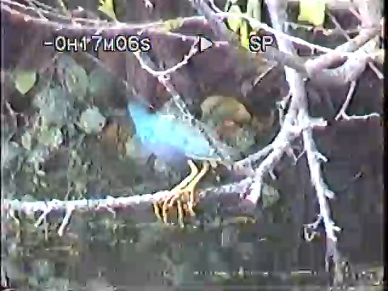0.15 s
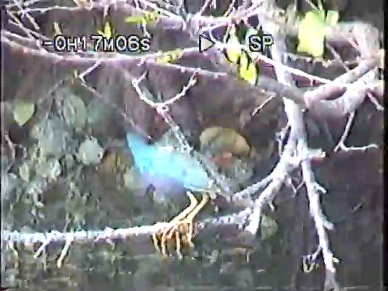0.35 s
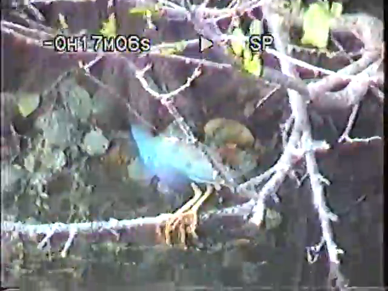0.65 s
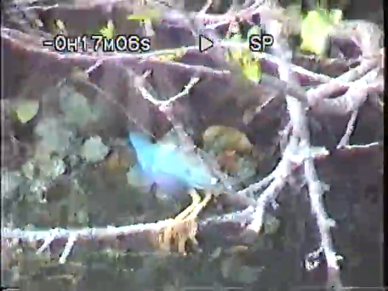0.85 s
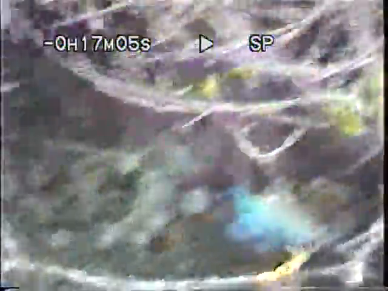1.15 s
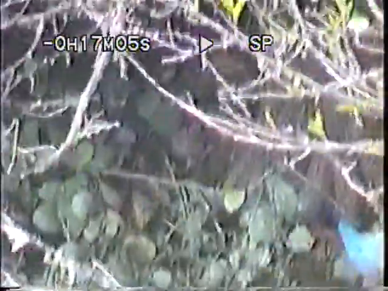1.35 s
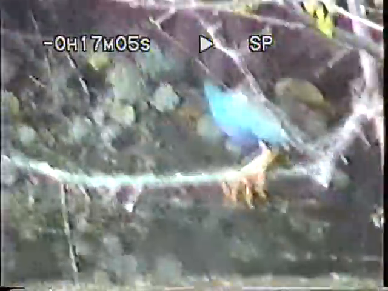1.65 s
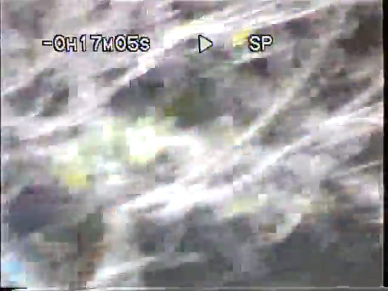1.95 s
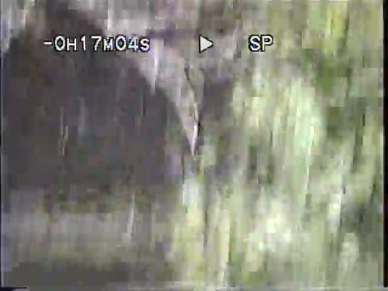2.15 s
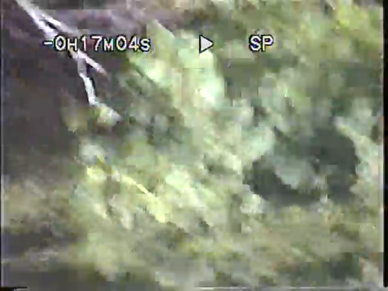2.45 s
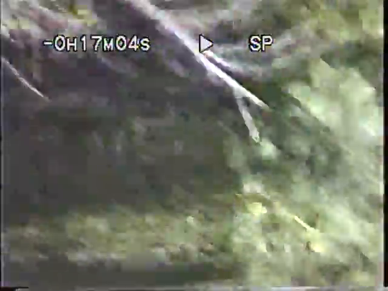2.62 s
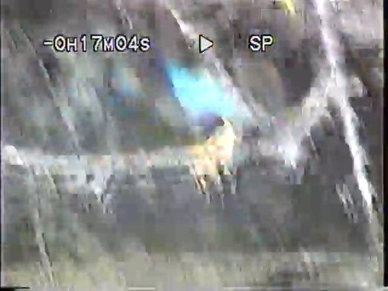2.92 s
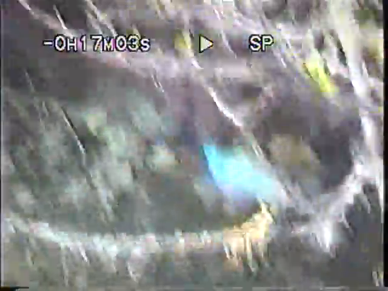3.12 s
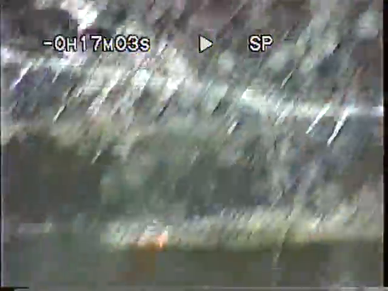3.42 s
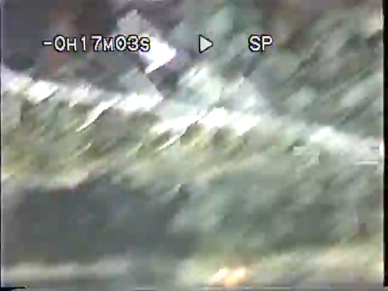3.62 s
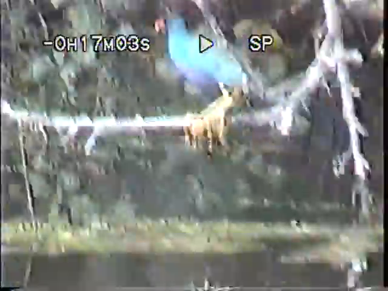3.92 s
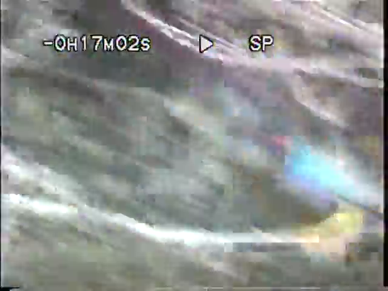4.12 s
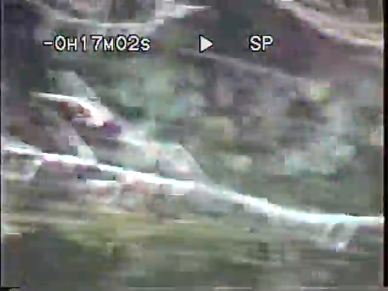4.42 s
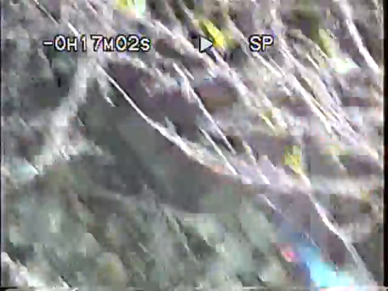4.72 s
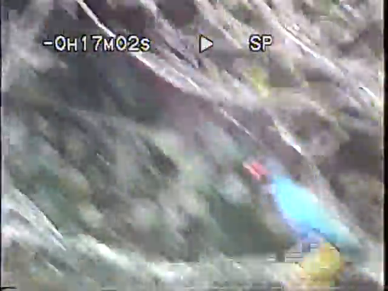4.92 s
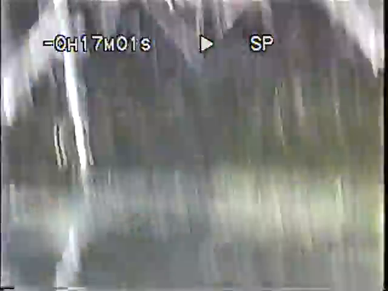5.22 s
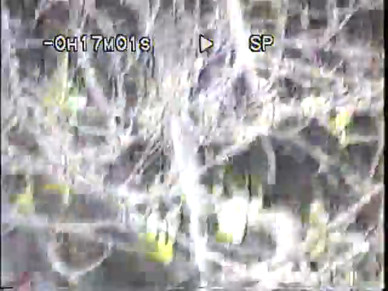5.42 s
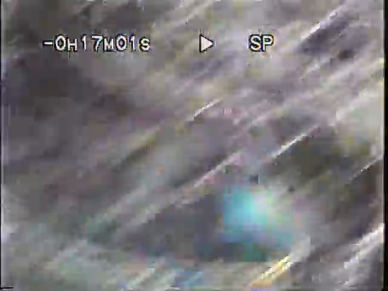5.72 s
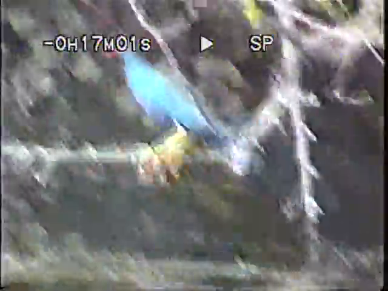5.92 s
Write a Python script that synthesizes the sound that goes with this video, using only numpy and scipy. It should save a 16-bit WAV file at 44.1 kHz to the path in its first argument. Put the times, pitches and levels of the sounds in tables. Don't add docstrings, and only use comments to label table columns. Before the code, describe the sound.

From 0 to about 2 seconds, a wetland bird gives harsh, buzzing two-voiced chatter: short notes, each under a tenth of a second, roughly every quarter second, strengthening toward the last at 1.85. Leaves and reeds rustle steadily and each note leaves a diffuse echo from the trees. Low gusts bump the microphone from 0.5 to 3 seconds, thickest around 2.5 to 2.8, where plastic handling creaks also tick. From 2.65 to 4.4, seven clear whistles start high, sag and hook downward, the last much weaker. Further birds add small chips around 2.4 to 2.6 and falling slides from 3.1, faint between 4.1 and 4.7, then bright and sharp at 4.95 and 5.45. Light creaks come at 4.3, 5.1 and 5.7, a last chip near 6. Wind is calmer late. A faint electrical buzz persists; the right side is nearly empty.

```python
import sys
import numpy as np
from scipy import signal
from scipy.fft import rfft, irfft, next_fast_len
from scipy.io import wavfile
from scipy.ndimage import uniform_filter1d, map_coordinates

SR = 44100
rng = np.random.default_rng(int(sys.argv[2]) if len(sys.argv) > 2 else 0)


def log_audio(samples):
    frames = np.atleast_2d(samples).T
    limited = np.clip(frames, -1, 1)
    pcm = np.round(limited * 32767).astype(np.int16)
    wavfile.write(sys.argv[1], SR, pcm)


def natural_amplitude(level_db):
    exponent = np.asarray(level_db, float) / 20
    return 10 ** exponent


N = 267466


def unit(x):
    return x / np.sqrt(np.mean(x ** 2) + 1e-20)


def curves(rows, t):
    s, *cols = np.transpose(rows)
    return [np.interp(t, s, c) for c in cols]


def wobble(rate, size):
    knots = rng.standard_normal(int(size * rate / SR) + 4)
    return map_coordinates(knots, [np.arange(size) * rate / SR])


def coloured(x, points):
    m = next_fast_len(len(x) + 4096)
    f, level = np.transpose(points)
    gain = natural_amplitude(np.interp(np.log(np.fft.rfftfreq(m, 1 / SR) + 1), np.log(f), level))
    return irfft(rfft(x, m) * gain, m)[:len(x)]


def add(out, s, x):
    i = round(s * SR)
    x = x[max(-i, 0):][:len(out) - max(i, 0)]
    out[max(i, 0):][:len(x)] += x


def phasor(hz):
    return np.exp(2j * np.pi * np.cumsum(hz) / SR)


def echoed(note, near_db, near_t60, trees_db, trees_s, trees_t60):
    # (frequency [Hz], gain [dB])
    leaf_colour = [(1900, -33), (2200, -5.5), (2600, -3.5), (3200, 4), (4000, -4.5), (5000, -3), (7500, 4),
                   (9500, -0.5), (13000, -1)]
    t = np.arange(int(.9 * SR)) / SR
    late = np.maximum(t - trees_s, 0)
    near = natural_amplitude(-60 * t / near_t60) * (t > .003)
    trees = natural_amplitude(-60 * late / trees_t60) * (1 - np.exp(-late / .015))
    far = natural_amplitude(-60 * late / 1.6) * (late > 0)
    shape = natural_amplitude(near_db) * near / np.linalg.norm(near)
    shape += natural_amplitude(trees_db) * trees / np.linalg.norm(trees)
    shape += natural_amplitude(trees_db - 3) * far / np.linalg.norm(far)
    wet = signal.fftconvolve(note, coloured(shape * rng.standard_normal(len(t)), leaf_colour))
    wet = wet * natural_amplitude(2.6 * np.tanh(wobble(260, size=len(wet))))
    add(wet, 0, note)
    return wet


def chatter():
    # (time after onset [s], upper pitch [Hz], upper level [dB], lower pitch [Hz], lower level [dB])
    note_shape = [(.006, 2950, -51, 2540, -46), (.014, 3750, -37, 2450, -39), (.025, 3700, -43, 2350, -42),
                  (.03, 3830, -32, 2640, -31), (.041, 4150, -33, 2300, -36), (.053, 3120, -35, 2170, -34),
                  (.063, 3230, -32, 2540, -38), (.07, 2750, -48, 2650, -22), (.083, 2750, -62, 2420, -25)]
    # (time [s], level as the head turns [dB], upper voice [dB], extra push on the last 20 ms [dB])
    chatter_notes = [(-.105, -2.5, -3.5, -1), (0.161, -7.5, -3.5, 3), (.426, -7, -2.5, 2.5),
                     (.709, -6.5, -2, 6), (.969, -5, -1, 1.5), (1.249, -4, -3, -2), (1.525, -1, -4, -1),
                     (1.849, 0, -4, -2.5)]
    fade_db_per_s = 1200
    echo_db, rasp_db = -13.5, -27.5
    trill_s, trill_crest_s, trill_db, warble_hz = .0098, .0695, 4, 130

    out, t = np.zeros(N), np.arange(int(.1 * SR)) / SR
    upper_hz, upper_db, lower_hz, lower_db = curves(note_shape, t)
    beak = np.exp(-((upper_hz + lower_hz - 6500) / 450) ** 2)
    beat = np.cos(2 * np.pi * (t - trill_crest_s) / trill_s)
    throb = trill_db * beat
    upper_hz = upper_hz + warble_hz * beat
    gate = signal.windows.tukey(len(t), .15)
    gate *= natural_amplitude(-fade_db_per_s * np.maximum(t - note_shape[-1][0], 0))
    for s, db, high_db, push_db in chatter_notes:
        shake = [np.tanh(wobble(rate, size=len(t))) for rate in (500, 500, 350, 300, 300, 300)]
        push = push_db * np.tanh((t - .074) / 0.0073) * (t > .064)
        upper = phasor(upper_hz * (1 + .022 * shake[0]))
        lower = phasor(lower_hz * (1 + .03 * shake[1]))
        hi = natural_amplitude(upper_db + high_db + 2 + .6 * throb + 4 * shake[2])
        lo = natural_amplitude(lower_db + push + throb + 3 * shake[3])
        voice = hi * upper + lo * lower
        voice += natural_amplitude(-11) * hi * upper ** 2 + natural_amplitude(-27) * hi * upper ** 3
        voice += natural_amplitude(-18) * lo * lower ** 2
        voice += natural_amplitude(-9 + 4 * shake[4]) * beak * np.minimum(hi, lo) * upper * lower
        breath = coloured(rng.standard_normal(len(t)), [(1500, -24), (2200, 19.5), (4000, 5),
                                                        (6000, -2.5), (10500, -5), (14500, -18)])
        rasp = natural_amplitude(rasp_db - db + throb / 2 + 4 * shake[5]) * np.sqrt(natural_amplitude(upper_db)) * breath
        note = natural_amplitude(db) * gate * (np.sqrt(2) * voice.real + rasp)
        add(out, s, echoed(note, near_db=-3.0, near_t60=0.27,
                           trees_db=echo_db - db, trees_s=0.072, trees_t60=0.45))
    return out


def wind():
    # (time of the crest [s], half length [s], strength [dB], sharpness [dB])
    gusts = [(0.476, 0.07, -30, -14), (0.622, 0.048, -32, -18), (0.75, .03, -35.5, -8),
             (.89, 0.075, -30, -3), (1.01, 0.11, -46, 0), (1.15, .04, -40, -25), (1.363, 0.084, -33, -39),
             (1.556, 0.019, -31, -4), (1.63, 0.048, -33.5, -6), (2.043, 0.029, -34.5, -29),
             (2.144, .04, -34, -5), (2.297, 0.07, -41, -19), (2.417, 0.05, -43.5, 4),
             (2.564, 0.048, -28, 0.5), (2.665, 0.037, -43, 10), (2.725, 0.039, -30.5, 13),
             (2.856, 0.024, -34.5, -11), (2.974, 0.15, -40, -1), (3.194, 0.058, -56, -13),
             (3.801, 0.067, -56, 9), (5.566, 0.069, -46.5, 4), (5.943, 0.044, -42, -4)]
    # (time of the crest [s], peak [dB], frequency [Hz])
    eddies = [(0.476, -31, 99), (0.585, -20, 127), (0.8682, -28, 98), (0.9243, -24, 148),
              (1.305, -24.5, 129), (1.409, -22, 100), (1.5695, -33, 127), (2.1308, -20, 142),
              (2.1618, -20, 158), (2.4268, -24, 155), (2.549, -18.5, 161), (2.5634, -20.5, 158),
              (2.585, -19.5, 176), (2.613, -18.5, 178), (2.654, -13.5, 173), (2.7017, -22, 158),
              (2.717, -14, 165), (2.733, -13.5, 237), (2.75, -36, 92), (2.7762, -24, 153),
              (2.907, -16.5, 180)]
    # (time [s], level [dB])
    marsh_level = [(0.0, -48), (2.07, -45.5), (2.48, -47.5), (3.02, -46.5), (3.56, -47.5), (4.56, -46.5),
                   (6.06, -47.5)]
    # (frequency [Hz], density [dB per Hz])
    rustle_colour = [(71, -10.5), (120, -6.5), (180, -17.5), (203, -11.5), (234, -8.5), (403, -10),
                     (921, -8), (1940, -14.5), (2580, -15), (2970, -15.5), (4270, -18), (5330, -22.5),
                     (12700, -36.5), (14900, -36)]
    buffet_colour = [(20, 1), (45, -3), (85, 1.5), (130, -4.5), (200, -14), (400, -61)]
    flutter_colour = [(60, -23), (120, -4), (170, 0.5), (250, -0.5), (340, -7), (500, -16.5), (1200, -66)]
    calm_db, calm_sharp_db, calm_swing_db = -52.5, 8, 2.5

    t = np.arange(N) / SR
    crest, half, db, sharp_db = np.transpose(gusts)[:, :, None]
    puffs = natural_amplitude(db) * np.exp(-((t - crest) / half) ** 2)
    calm = natural_amplitude(calm_db + calm_swing_db * wobble(8, size=N))
    buffet = calm + puffs.sum(0)
    flutter = natural_amplitude(calm_sharp_db) * calm + (natural_amplitude(sharp_db) * puffs).sum(0)
    lumps = 2 * wobble(30, size=N)
    low = unit(natural_amplitude(lumps) * coloured(rng.standard_normal(N), buffet_colour))
    sharp = unit(natural_amplitude(1.4 * lumps) * coloured(rng.standard_normal(N), flutter_colour))
    out = natural_amplitude(-2.5) * buffet * low + natural_amplitude(-10.0) * flutter * sharp
    for s, peak_db, eddy_hz in eddies:
        cycles = (t[:SR // 20] - 1 / 40) * eddy_hz
        push = np.cos(2 * np.pi * cycles) * np.exp(-(cycles / 0.47) ** 2)
        add(out, s - 1 / 40, rng.choice([-1, 1]) * natural_amplitude(peak_db - 5) * push)
    leaves = unit(coloured(rng.standard_normal(N), rustle_colour))
    rustle_db = curves(marsh_level, t)[0] + 3.0 + 0.38 * wobble(5.88, size=N)
    return out + natural_amplitude(rustle_db) * leaves


def buzz():
    field_hz = 59.9418
    since = (np.arange(N) / SR - .0116) % (1 / field_hz)
    spike = 1.3 * np.exp(-((since - .0003) / .00012) ** 2)
    block = (since < .0013) * (1 + spike)
    return natural_amplitude(-50.0) * coloured(block, [(15, -16), (60, -1.5), (150, 0.5), (3000, -8), (9000, 1.5)])


def slides():
    # (time [s], length [s], first pitch [Hz], last
    # pitch [Hz], level [dB])
    own_end_notes = [(2.436, 0.037, 2680, 2644, -45.5), (2.583, 0.029, 2675, 2760, -45.5),
                     (3.464, 0.12, 6030, 4270, -58), (4.884, 0.024, 5470, 4460, -44.5),
                     (4.994, 0.036, 2800, 2770, -48.5), (5.148, 0.038, 2700, 2640, -49),
                     (5.967, 0.033, 2740, 2520, -45.5)]
    # (time [s], length [s], first pitch [Hz], level [dB], echo [dB])
    slide_notes = [(3.078, .085, 5590, -45.5, -1), (3.454, 0.075, 5440, -45.5, 1),
                   (4.136, 0.079, 5080, -52, -5), (4.369, 0.098, 5310, -53, -8),
                   (4.65, 0.099, 5020, -55.5, -12), (4.956, 0.098, 5640, -36, -11),
                   (5.447, 0.092, 5500, -31.5, -28)]
    slide_end_hz, chip_echo_db = 3880, -18

    out = np.zeros(N)
    notes = [(s, n, hz, slide_end_hz, db, echo) for s, n, hz, db, echo in slide_notes]
    notes += [(*row, chip_echo_db) for row in own_end_notes]
    for s, length, first_hz, last_hz, db, echo_db in notes:
        u = np.linspace(0, 1, round(length * SR))
        bends = .07 * np.exp(-u / .05) - .07 * np.exp((u - 1) / .1)
        glide_hz = first_hz + (last_hz - first_hz) * u
        tone = phasor(glide_hz * (1 + bends + 0.012 * wobble(475, size=len(u))))
        broken_db = np.clip(-.2 * (db + 30), 1, 4) * wobble(150, size=len(u))
        swell = np.sin(np.pi * u ** .8) ** .5 * natural_amplitude(db + broken_db)
        octave_db = -25 + echo_db / 6 - 10 * u ** 2 + 4 * wobble(120, size=len(u))
        note = np.sqrt(2) * swell * (tone + natural_amplitude(octave_db) * tone ** 2).real
        add(out, s, echoed(note, near_db=-7, near_t60=0.88,
                           trees_db=echo_db, trees_s=0.038, trees_t60=0.36))
    return out


def creaks():
    # (time [s], peak [dB], ring [Hz], crack [dB])
    ticks = [(2.647, -45, 982, -15), (2.667, -31, 1580, -8), (2.676, -34.5, 1667, -8),
             (2.68, -24, 844, -16), (2.688, -34, 1060, -1.5), (4.339, -27.5, 2350, -9),
             (4.342, -32, 1740, -21), (5.117, -32, 1680, -22), (5.122, -41, 1190, -14),
             (5.264, -55, 851, 12), (5.699, -40, 1270, -17)]
    out, t = np.zeros(N), np.arange(SR // 40) / SR
    for s, db, ring_hz, crack_db in ticks:
        body = coloured(rng.standard_normal(len(t)),
                        [(150, -22), (500, 7), (900, 15), (2600, 3), (4000, -19.0)])
        crack = coloured(rng.standard_normal(len(t)),
                         [(2000, -32), (3500, 11), (6500, 1), (9000, -6), (13000, -35)])
        knock = np.sin(2 * np.pi * ring_hz * t) + natural_amplitude(-4) * unit(body) + natural_amplitude(crack_db) * unit(crack)
        envelope = natural_amplitude(db - 60 * t / 0.035) * (1 - np.exp(-t / 0.00009))
        add(out, s + 0.000964, envelope * knock)
    return out


def hooks():
    # (time [s], length [s], peak as the head turns [dB], plateau [Hz], sag time [s])
    hook_notes = [(2.655, .124, -29.5, 2918, .025), (2.926, .127, -28.5, 2822, .037),
                  (3.191, .117, -27.5, 2752, .039), (3.435, .131, -26.5, 2697, .047),
                  (3.707, .121, -25, 2746, .0385), (3.972, .116, -27, 2718, .033),
                  (4.274, .113, -36, 2765, .028)]
    # (frequency [Hz], gain [dB])
    throat = [(5000, -14), (5400, -25.5), (5600, -22), (5850, -17.5), (6300, -21), (8000, -33),
              (8800, -23.5), (10200, -42)]
    overshoot_hz, sag_shape = 570, 1.6
    flick_hz, flick_s = 302, .006
    end_hz, drop_hz_per_s = 2400, 24000
    attack_s, release_s = .004, .004
    swell_db, crest_sags, sink_db_per_s = 12, 1.73, 57
    sung_db = -27
    half_tones_db = -30
    echo_db, turn_db_per_s = -47, 4

    out, (throat_hz, throat_db) = np.zeros(N), np.transpose(throat)
    for s, length, peak_db, plateau_hz, sag_s in hook_notes:
        since = np.arange(round(length * SR)) / SR
        left, late, size = length - since, since - crest_sags * sag_s, len(since)
        hz = plateau_hz + overshoot_hz * np.exp(-(since / sag_s) ** sag_shape)
        hz += flick_hz * np.exp(-since / flick_s)
        hz = uniform_filter1d(np.minimum(hz, end_hz + drop_hz_per_s * left), size=120)
        db = peak_db - np.maximum(-late * swell_db / crest_sags / sag_s, late * sink_db_per_s)
        gate = (1 - np.exp(-(since / attack_s) ** 2)) * (1 - np.exp(-(left / release_s) ** 2))
        half = phasor(hz * (1 + .003 * wobble(200, size=size)) / 2)
        tone = natural_amplitude(1.1 * wobble(122, size=size)) * half ** 2
        for k in (2, 3):
            partial_db = np.interp(k * hz, throat_hz, throat_db) + (k - 2) * (sung_db - peak_db)
            tone += natural_amplitude(partial_db + 3.2 * wobble(62, size=size)) * half ** (2 * k)
        half_gain = natural_amplitude(half_tones_db + 5 * np.tanh(wobble(123, size=size)))
        jitter = phasor(170 * wobble(397, size=size))
        tone += half_gain * (half ** 3 + natural_amplitude(-2.5) * half ** 5) * jitter
        note = np.sqrt(2) * gate * natural_amplitude(db) * tone.real
        turned_db = turn_db_per_s * (s - hook_notes[0][0])
        add(out, s, echoed(note, near_db=-11.5, near_t60=0.5,
                           trees_db=echo_db + turned_db - peak_db, trees_s=0.091, trees_t60=0.21))
    return out


def scene():
    left = 2 * (chatter() + wind() + slides() + creaks() + hooks())
    return np.array([left, np.zeros(N)])


def low_pass(x):
    return signal.sosfilt(signal.butter(12, 15060, fs=SR, output="sos"), x)


def record(dry):
    # (frequency [Hz], gain [dB])
    wired_colour = [(20, -21.5), (45, -1), (70, -0.5), (9000, -1), (10000, 2.5), (10800, -4), (11600, -4.5),
                    (12300, 2.5), (13300, 4), (14000, -15), (14500, -10)]
    # (frequency [Hz], density [dB per Hz])
    tape_hiss = [(25, 20), (100, 14), (500, 5), (1500, 1), (2500, -34), (8000, -20), (12000, -73),
                 (14000, -71)]
    wired = coloured(dry[0], wired_colour)
    leak = natural_amplitude(-56) * coloured(wired, [(200, -20), (1500, -5), (3000, 0), (8000, 3)])
    hiss = natural_amplitude(-67.5) * unit(coloured(rng.standard_normal(N), tape_hiss))
    return low_pass(np.array([wired, leak + hiss]) + buzz())


dry = scene()
out = record(dry)
log_audio(out)
```